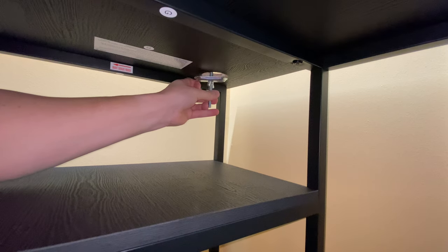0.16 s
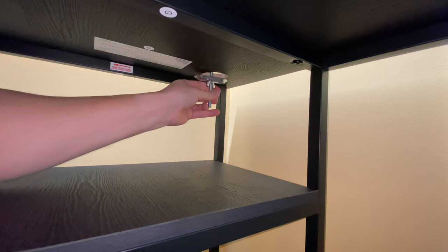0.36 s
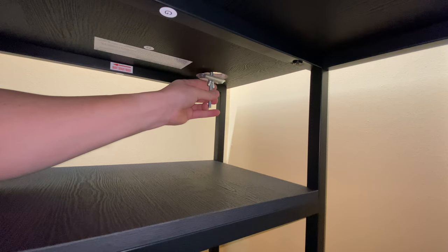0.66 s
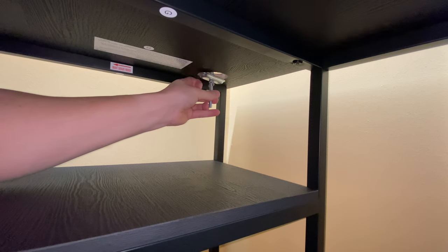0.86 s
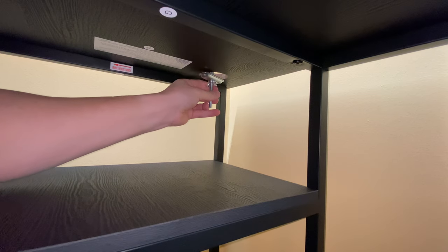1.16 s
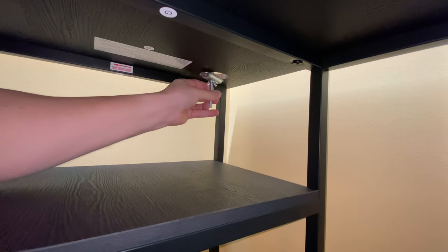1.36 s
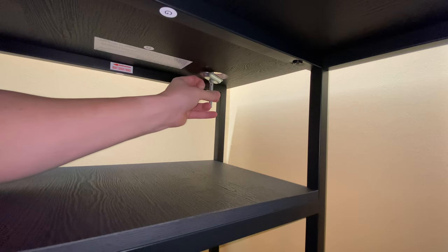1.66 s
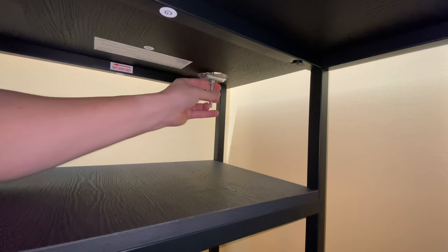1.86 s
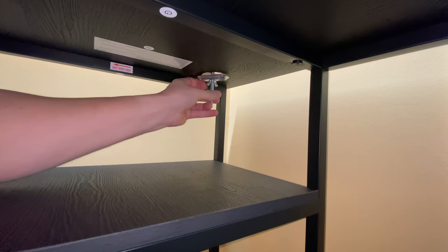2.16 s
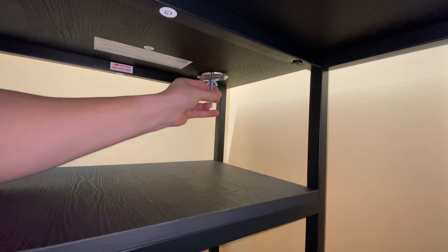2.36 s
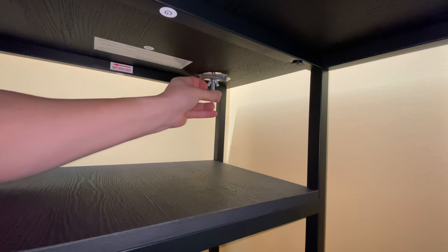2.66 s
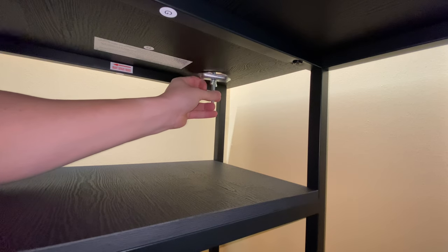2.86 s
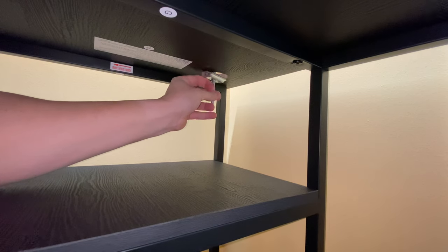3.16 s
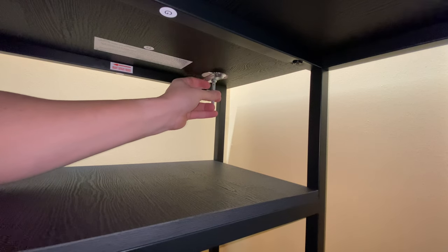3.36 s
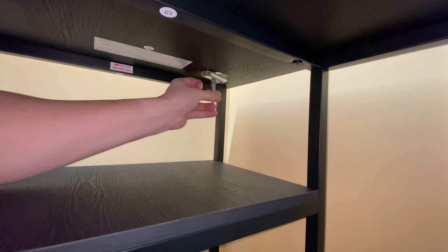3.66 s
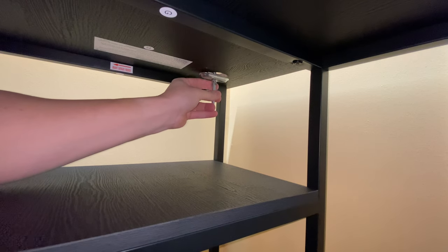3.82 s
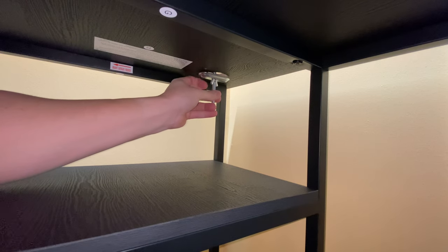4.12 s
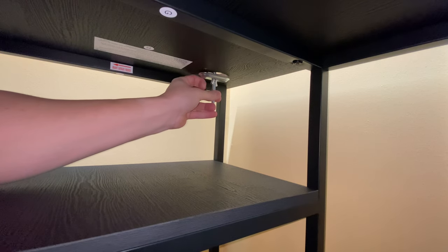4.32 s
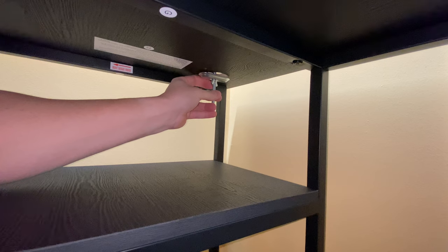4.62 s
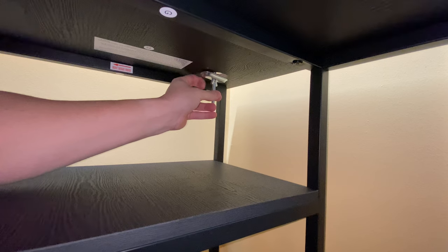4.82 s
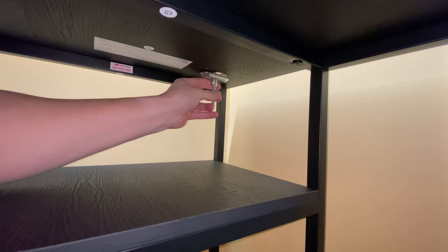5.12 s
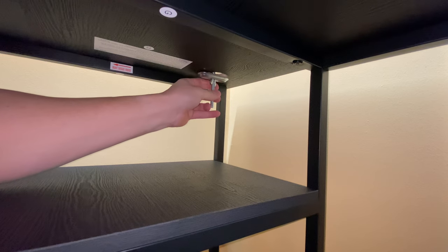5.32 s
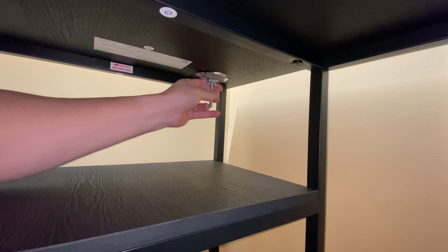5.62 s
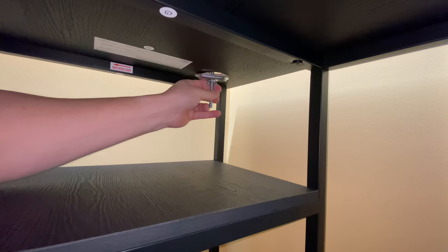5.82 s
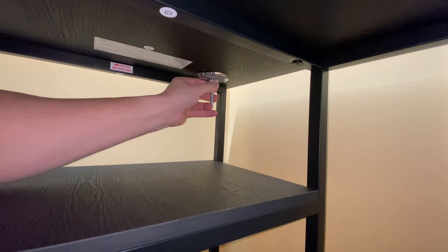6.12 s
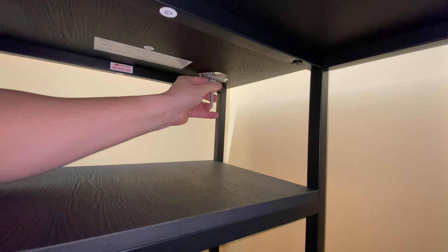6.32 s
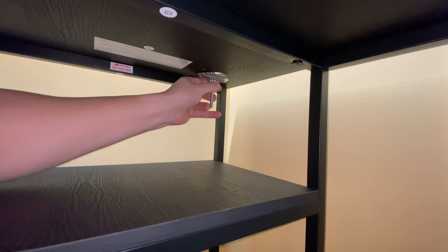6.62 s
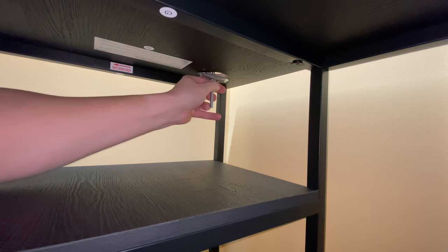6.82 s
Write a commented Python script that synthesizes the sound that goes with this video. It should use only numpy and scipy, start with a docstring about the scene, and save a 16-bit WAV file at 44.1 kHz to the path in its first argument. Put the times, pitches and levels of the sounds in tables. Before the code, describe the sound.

A loose steel plate chatters and clinks on a bolt as a wing nut is turned by hand under a wooden shelf, with three hard knocks.

```python
"""Wing nut turned under a shelf

A hand turns a wing nut up a bolt under a wooden shelf, and a loose steel plate chatters on the bolt.
Each contact is a burst of bounces that rings the plate's modes and raps the board; three hard knocks clank.
Hand bumps swing the shelf's low modes; noise rubs and ticks in the thread; shaped noise makes the
wings jingle, the fingers slide and a hand drag. Two microphone ports hear it in a small room with a low hum."""
import sys
import numpy as np
from scipy import signal
from scipy.fft import rfft, irfft, next_fast_len
from scipy.io import wavfile
from scipy.ndimage import map_coordinates

SR = 44100
rng = np.random.default_rng(int(sys.argv[2]) if len(sys.argv) > 2 else 0)


def to_wav(sig):
    """Store sig (one row per channel, or 1-D mono) as 16-bit WAV at the path in sys.argv[1].

    Samples outside -1..1 are clipped; the rate is SR.
    """
    pcm = np.clip(np.atleast_2d(sig), -1, 1) * 32767
    pcm = np.round(pcm).astype(np.int16)
    wavfile.write(sys.argv[1], SR, pcm.T)  # frames by channels


def voltage_ratio(decibels):
    """Convert decibels (scalar or array-like) to amplitude ratios, 20 dB per decade."""
    exponent = np.asarray(decibels, float) / 20
    return 10 ** exponent


N = 307818
T = np.arange(SR // 3) / SR  # clock of one short sound [s]
LEAD_IN_S = 0.006  # contacts and bumps start to swell this long before their listed time

# the steel plate's ringing modes: pitch [Hz]
PLATE_HZ = [2700, 2745, 2972, 3310, 4320, 5005, 5140, 5190, 5280, 5675, 5830, 6260, 6870, 7478, 9608, 9935,
            13552, 14112]
# strength and ring of the same modes: (level [dB], time to fall 60 dB before shortening [s])
PLATE_RING = [(1, 0.058), (-5, 0.14), (-5, 0.078), (-5, 0.078), (-14.5, 0.17), (-13.5, 0.17), (-1, 0.092),
              (-12, 0.2), (-28.5, 0.59), (-12.5, 0.1), (-18, 0.16), (1, 0.063), (-16, 0.5), (-1, 0.23),
              (-9, 0.35), (1.5, 0.067), (-8, 0.2), (-11.5, 0.098)]
# colour of the dense small modes of nut and bolt: (frequency [Hz], level [dB per Hz])
SIZZLE = [(2300, -49.5), (2700, 11), (3400, 6), (4000, -21.5), (5200, -11), (7000, -17), (8200, -16.5),
          (9900, -7.5), (11000, -8.5), (11600, -19.5), (13600, -23), (15000, -52.5), (16000, -72)]
# resonances of the wooden board: (frequency [Hz], width [Hz], level [dB])
BOARD = [(430, 60, -7), (591, 85, -2.5), (925.4, 40, 7), (1102, 96, 2), (1265, 57, 4.5), (1326, 149, 0),
         (1653, 186, -1.5), (1853, 140, 2.5), (2570, 180, -13.5), (2780, 100, -14.5), (3450, 220, -13)]
# colour of the shelf's low rumble: (frequency [Hz], level [dB per Hz])
SHELF_COLOUR = [(40, -41.5), (70, -16.5), (150, -8), (200, -11), (250, -2.5), (300, -5.5), (400, -7),
                (500, -19), (700, -21), (950, -22.5), (1500, -58.5)]


def unit(x):
    """Scale to rms 1."""
    return x / np.sqrt(np.mean(x ** 2) + 1e-20)


def along(points, hz):
    """Read a curve of (Hz, value) points on a log frequency axis."""
    f, v = np.transpose(points)
    return np.interp(np.log(hz + 1), np.log(f + 1), v)


def filtered(x, response):
    """Multiply the spectrum of x by a response, given as a function of frequency."""
    m = next_fast_len(x.shape[-1] + 8192)
    spectrum = rfft(x, m) * response(np.fft.rfftfreq(m, 1 / SR))
    return irfft(spectrum, m)[..., :x.shape[-1]]


def resonant(peaks, x):
    """Pass x through side-by-side resonances of (Hz, width Hz, dB), every other one upside down."""
    def response(f):
        return sum((-1) ** k * voltage_ratio(db) * 1j * f * width / (centre * centre - f * f + 1j * f * width)
                   for k, (centre, width, db) in enumerate(peaks))
    return filtered(x, response)


def hiss(spectrum, size):
    """Coloured noise of rms 1."""
    return unit(filtered(rng.standard_normal(size), lambda hz: voltage_ratio(along(spectrum, hz))))


def gritty(grit_db, rate):
    """Uneven gain of rms 1, drawn from random levels that come rate times a second."""
    knots = rng.standard_normal(int(N * rate / SR) + 4)
    return unit(voltage_ratio(grit_db * map_coordinates(knots, [np.arange(N) * rate / SR])))


def fade(t60, rise):
    """Rounded rise, then an exponential fall of 60 dB in t60 seconds."""
    return voltage_ratio(-60 * T / max(t60, .002)) * (1 - np.exp(-(T / rise) ** 2))


def add(track, s, sound):
    """Mix a sound in at time s."""
    track[round(s * SR):][:len(sound)] += sound


def air():
    """A wavering low hum and the faint rush of the house, partly shared by the ports."""
    # colour of the rush: (frequency [Hz], level [dB per Hz])
    rush_colour = [(25, -20), (38, -4.5), (60, 9.5), (174, -7.5), (271, -9.5), (703, -34), (2970, -29),
                   (3390, -54.5), (4050, -35), (8420, -49.5), (10500, -48.5), (12000, -45), (15600, -83),
                   (22000, -120)]
    hum_hz, hum_db, rush_db = 47.2, -56, -59
    shared, own = hiss(rush_colour, N), hiss(rush_colour, N)
    own = filtered(own, lambda hz: np.clip(hz / 500, .2, 1))  # the ports agree more in the bass
    hum = voltage_ratio(hum_db) * gritty(grit_db=7.0, rate=12) * np.sin(2 * np.pi * hum_hz * np.arange(N) / SR)
    return voltage_ratio(rush_db) * np.array([shared + own, shared - own]) + hum


def thread():
    """With each twist the nut's thread and the fingers rub, heard through board, steel and shelf."""
    # twists of the nut: (fastest moment [s], length [s], rub in board [dB], rub in steel [dB],
    # shelf shake [dB])
    twists = [(0.041, .25, -32, -38, -40.5), (.4, 0.37, -42, -43.5, -47.5), (.74, 0.394, -44.5, -58, -55),
              (0.992, 0.22, -47, -60, -50.5), (1.168, 0.34, -53, -63.5, -45), (1.603, 0.22, -53, -50, -59),
              (1.959, 0.34, -41, -52.5, -45.5), (2.327, .15, -49, -46, -35),
              (2.535, 0.13, -46.5, -52, -28.5), (2.813, 0.31, -43, -58, -48.5),
              (3.094, 0.15, -31, -40.5, -32), (3.299, 0.3, -53, -61, -46.5), (3.546, 0.18, -40, -42, -39.5),
              (3.71, 0.34, -53.5, -64, -46.5), (3.916, 0.18, -40, -55.5, -41),
              (4.38, 0.19, -48.5, -63, -54), (4.891, 0.19, -51, -66.5, -53), (5.301, 0.36, -62, -95, -50.5),
              (5.693, 0.52, -55, -81.5, -53.5), (6.106, 0.23, -49.5, -88, -46),
              (6.481, 0.34, -46.5, -57, -40.5), (6.745, 0.98, -66, -73, -67)]
    fade_db = 19  # loss half a length away from the fastest moment
    ticks_per_s, tick_db, tick_spread_db = 45, 27, 5.5  # burrs of the thread catch and let go
    s, length, *db = np.transpose(twists)
    t = np.arange(0, N / SR + .01, .002)
    speed = voltage_ratio(-fade_db * np.abs(t - s[:, None]) / (length[:, None] / 2))
    board, steel, shake = [np.interp(np.arange(N) / SR, t, level) for level in voltage_ratio(db) @ speed]

    tick_level = voltage_ratio(tick_db + tick_spread_db * rng.standard_normal(N))
    ticks = (rng.random(N) < ticks_per_s / SR) * tick_level
    catches = gritty(grit_db=6.5, rate=70) * rng.standard_normal((2, N)) + ticks
    rings = resonant([(hz, 30, level) for hz, (level, _) in zip(PLATE_HZ, PLATE_RING)], catches[0])
    scrape = unit(gritty(grit_db=9, rate=390) * hiss(SIZZLE, N) + 0.81 * unit(rings))
    rub = unit(resonant(BOARD, catches[1]))
    rumble = gritty(grit_db=4, rate=23) * hiss(SHELF_COLOUR, N)
    return board * rub + steel * scrape + shake * rumble


def plate():
    """Each contact is a short chatter of bounces that rings the plate's modes and raps the board."""
    # plate contacts: (time [s], bright ring [dB], body ring [dB], rap on the board [dB],
    # chatter length [s])
    contacts = [(0.036, -18.5, -32.5, -36.5, 0.03), (0.15, -29, -39, -34.5, 0.033),
                (.251, -45, -53, -48, .028), (0.319, -28.5, -40.5, -34, 0.018),
                (0.3465, -26.5, -43.5, -40, 0.054), (0.4216, -19, -30.5, -29.5, 0.021),
                (0.449, -20.5, -32, -24.5, .014), (.52, -37, -47, -42, 0.024),
                (0.57, -37.5, -44.5, -51, 0.017), (0.623, -42, -53, -48, 0.015),
                (0.676, -46, -53, -57, 0.018), (0.736, -36.5, -46.5, -40.5, .01),
                (0.7997, -27, -37.5, -29.5, .018), (.814, -14, -28, -26.5, 0.017),
                (.838, -22, -31.5, -29, .014), (1.0822, -38.5, -50.5, -40.5, 0.067),
                (1.531, -24, -36, -27.5, 0.027), (1.807, -62, -62.5, -48.5, 0.046),
                (1.8584, -24.5, -40, -38, .035), (1.901, -38, -45.5, -35, 0.036),
                (1.985, -13.5, -32.5, -29.5, 0.021), (2.2267, -20.5, -38.5, -28, 0.017),
                (2.2778, -23.5, -34.5, -32.5, 0.032), (2.503, -54, -55.5, -42.5, 0.054),
                (2.565, -34, -45, -35, 0.018), (2.5922, -37.5, -46, -42.5, .044),
                (2.732, -31.5, -40.5, -28, 0.038), (2.898, -47.5, -58, -46.5, 0.05),
                (2.942, -51, -53, -48, .047), (3.082, -22, -33, -35, .021),
                (3.171, -39.5, -46.5, -41, .032), (3.299, -54.5, -61, -45.5, .033),
                (3.375, -38, -45, -42, 0.045), (3.407, -46, -44.5, -34, 0.025),
                (3.459, -30, -40.5, -37, 0.038), (3.499, -45, -53, -37, 0.031),
                (3.545, -27.5, -44, -34.5, 0.027), (3.567, -27, -38.5, -47, 0.039),
                (3.653, -32.5, -49, -39, 0.022), (3.7254, -48.5, -52, -48.5, 0.045),
                (3.779, -57, -60, -51, 0.025), (3.828, -43.5, -49, -46.5, 0.039),
                (3.929, -32, -41, -34.5, 0.012), (3.943, -19, -38.5, -31.5, 0.019),
                (4.2401, -21, -37.5, -31, 0.014), (4.3099, -20, -31, -26, 0.023),
                (4.5905, -58, -68.5, -65, 0.023), (4.84, -81, -71, -61.5, .02),
                (4.727, -69.5, -69.5, -52, 0.08), (5.4727, -40, -55, -44, 0.03),
                (5.482, -29, -39, -41, 0.015), (5.684, -55, -66, -49.5, 0.026),
                (5.819, -77, -76, -57.5, 0.023), (5.855, -65, -76, -66, 0.015),
                (6.066, -58, -65, -51.5, .033), (6.107, -51, -63, -60, 0.017),
                (6.1375, -38.5, -44, -40, 0.023), (6.3155, -38.5, -47, -37.5, 0.037),
                (6.3525, -30.5, -40.5, -32, 0.034), (6.439, -27.5, -39, -38, 0.022),
                (6.462, -51, -67, -38, 0.052), (6.526, -37, -47.5, -44.5, 0.028),
                (6.707, -44.5, -48, -40.5, 0.032), (6.9197, -63, -64, -47.5, 0.077),
                (6.9714, -60, -64, -44, 0.033)]
    # pitches that part the bright, body and low rings: [Hz]
    part_edges = [8500, 3800]
    # clear modes over the bright, body and rap strength: [dB]
    modes_over = [-8, -0.3, 1.77]
    # dense buzz over the bright and body strength: [dB]
    buzz_over = [-3.5, 3.5]
    rap_over_db = 8.5  # the board's own answer over the rap strength
    bounce, snap, trail, rap = 0.69, 0.61, 3.54, 2.55  # t60 of each part over the chatter length
    ahead_s, ahead_db = 0.009, -18.5  # a faint copy sounds ahead of each contact, softening the attack

    out = np.zeros(N + SR)
    hz = np.c_[PLATE_HZ]
    mode_db, t60 = np.transpose(PLATE_RING)[:, :, None]
    sizzle = hiss(SIZZLE, N + SR)
    board = unit(resonant(BOARD, rng.standard_normal(N + SR)))
    bands = [unit(filtered(sizzle, lambda f: (f > low) & (f < high)))
             for low, high in zip(part_edges, [SR] + part_edges)]
    waves = np.exp(2j * np.pi * hz * T)
    part = np.sum([hz < edge for edge in part_edges], axis=0)  # 0 bright, 1 body, 2 low
    dying = voltage_ratio(mode_db - 60 * T / (0.77 * t60)) * waves.imag  # 0.77 shortens every ring

    for s, *strength_db, length in contacts:
        chance_db = 5 * rng.standard_normal((len(PLATE_RING), 1))  # modes differ from blow to blow
        # cubing leaves a few strong bounces among weak ones
        bounces = rng.standard_normal(len(T)) ** 3 * fade(bounce * length, 0.0064)
        # how much of the chatter falls on each mode, divided out to hold its level
        caught = np.abs(waves @ bounces)[:, None] + .4 * np.linalg.norm(bounces)
        modes = voltage_ratio(np.add(strength_db, modes_over)[part] + chance_db) / caught * dying
        struck = modes.sum(axis=0) * (1 - np.exp(-T / 0.00064))
        ring = signal.fftconvolve(struck, bounces)[:len(T)]

        now = slice(round(s * SR), round(s * SR) + len(T))
        buzz = sum(voltage_ratio(db + over_db) * band[now]
                   for db, over_db, band in zip(strength_db, buzz_over, bands))
        tick = 4 * fade(snap * length, .0079) + 0.67 * fade(trail * length, .0054)
        thud = voltage_ratio(strength_db[-1] + rap_over_db) * board[now] * fade(rap * length, 0.0062)
        blow = ring + buzz * tick + thud
        add(out, s - LEAD_IN_S, blow)
        add(out, s - LEAD_IN_S - ahead_s, voltage_ratio(ahead_db) * blow * fade(0.11, .001))
    return out[:N]


def shelf():
    """Soft bumps of the hand set the board's low modes swinging for a few cycles."""
    # hand on shelf, level and length before the factors below: (time [s], level [dB], pitch [Hz],
    # length [s])
    bumps = [(0.044, -22, 265, 0.037), (0.156, -38, 238.5, 0.059), (0.232, -38.5, 304, 0.043),
             (0.346, -30, 233, 0.038), (0.451, -24, 239, 0.021), (0.576, -37, 261, 0.03),
             (0.617, -38, 239, 0.0305), (0.738, -44, 243, 0.072), (0.81, -27.5, 261, 0.033),
             (0.837, -19.5, 278.3, 0.024), (0.957, -38, 116, 0.044), (1.083, -36.5, 244, 0.062),
             (1.266, -43.5, 294.6, 0.066), (1.326, -43.5, 233.6, 0.061), (1.536, -27.5, 240, 0.041),
             (1.721, -31, 394, 0.01), (1.808, -32.5, 259, 0.026), (1.858, -41, 224.3, 0.12),
             (1.983, -33.5, 251.5, 0.092), (2.248, -24.5, 323, 0.024), (2.504, -14.5, 274, 0.026),
             (2.734, -25, 236, 0.025), (2.837, -48.5, 237, 0.026), (2.883, -40, 263, 0.082),
             (2.938, -35, 248, 0.025), (3.026, -30, 318, 0.042), (3.274, -42, 246, 0.091),
             (3.378, -24, 284, 0.023), (3.462, -33, 164, 0.037), (3.558, -30, 245, 0.027),
             (3.659, -37, 400, 0.024), (3.83, -42.5, 251, 0.036), (3.933, -35, 302, 0.044),
             (4.062, -45.5, 404, 0.026), (4.245, -42, 255, 0.11), (4.316, -28.5, 317, 0.037),
             (4.63, -49.5, 157, 0.069), (4.734, -46, 254, 0.048), (4.911, -49.5, 117, 0.083),
             (5.256, -43, 234, 0.0259), (5.362, -37, 262, 0.036), (5.48, -34, 237, 0.033),
             (5.872, -42, 240, 0.062), (5.935, -37.5, 250, 0.037), (6.149, -35.5, 252, 0.028),
             (6.331, -29.5, 253, 0.033), (6.439, -28.5, 246, 0.027), (6.71, -33.5, 239, 0.025)]
    swing_db, swing_t60 = 3.5, 3.02  # envelope over the listed level; t60 over the listed length
    out, body = np.zeros(N + SR), hiss(SHELF_COLOUR, N + SR)
    for s, db, hz, length in bumps:
        swing = np.sin(2 * np.pi * hz * T) + 0.72 * body[round(s * SR):][:len(T)]
        add(out, s - LEAD_IN_S, voltage_ratio(db + swing_db) * swing * fade(swing_t60 * length, 0.0058))
    return out[:N]


def knocks():
    """The plate's edge hits the board: one sharp blow, then a splintery decay, both through a clank."""
    # hard hits, level before the offsets below: (time [s], level [dB], time to fall 60 dB [s])
    hits = [(2.255, -7.5, 0.04), (2.727, -8.5, 0.02), (3.026, -9.5, 0.043)]
    # the board under a hard blow: (frequency [Hz], width in the decay [Hz], level [dB])
    clank_peaks = [(680, 90, 2), (874, 330, 1.5), (1185, 380, 4), (1844, 84, 8.5), (2144, 90, 5),
                   (2656, 170, 3.5), (3085, 180, -7.5), (4180, 730, -15.5)]
    crack_db, splinter_db = 20, -2.5  # first blow and decay over the listed level
    crack_wider = 4.2  # widening of the resonances in the blow
    blows, after = np.zeros(N + SR), np.zeros(N + SR)
    clank = unit(resonant(clank_peaks, rng.standard_normal(N + SR)))
    for s, db, t60 in hits:
        start = round(s * SR)
        blows[start] = voltage_ratio(db + crack_db)
        add(after, s, voltage_ratio(db + splinter_db) * clank[start:][:len(T)] * fade(t60, .0005))
    wide_peaks = [(hz, crack_wider * width, db) for hz, width, db in clank_peaks]
    return (resonant(wide_peaks, blows) + after)[:N]


def wings():
    """The nut's wings jingle: a loose shiver of noise in close high modes."""
    # jingles: (time [s], level [dB], time to fall 60 dB [s])
    jingles = [(6.137, -39.5, 0.15), (6.316, -39, .08), (4.33, -45, 0.097)]
    # modes of the wings, passed twice: (frequency [Hz], width [Hz], level [dB])
    wing_peaks = [(5130, 120, 1.5), (5680, 150, 0), (5810, 144, -3), (6150, 180, -13)]
    out = np.zeros(N + SR)
    shiver = unit(resonant(wing_peaks, resonant(wing_peaks, rng.standard_normal(N + SR))))
    for s, db, t60 in jingles:
        add(out, s, voltage_ratio(db) * shiver[round(s * SR):][:len(T)] * fade(t60, 0.0014))
    return out[:N]


def fingers():
    """Fingertips slide on the board: soft broad swishes of skin, made of noise that swells and dies."""
    # slides, times for a change of 28.5 dB: (loudest moment [s], level [dB], swell [s], die-away [s])
    slides = [(4.944, -42, 0.097, 0.06), (5.3, -60.5, .07, 0.14), (6.08, -49.5, 0.063, 0.044)]
    # colour of the swish: (frequency [Hz], level [dB per Hz])
    skin_colour = [(240, -30), (400, 3), (851, -4), (1510, 1.5), (1670, -13), (2810, -19), (3710, -14.5),
                   (4460, -25.5), (9500, -38), (12400, -68), (20900, -120)]
    t = np.arange(N) / SR
    level = sum(voltage_ratio(db - 28.5 * np.maximum((s - t) / swell, (t - s) / die))
                for s, db, swell, die in slides)
    return level * gritty(grit_db=1.5, rate=60) * hiss(skin_colour, N)


def drag():
    """A faint drone: noise in a few narrow resonances, held while the hand drags."""
    # the drone: (frequency [Hz], width [Hz], level [dB])
    drone_peaks = [(433, 29, -1), (1187, 74, -7), (1750, 51, -20)]
    start_s, end_s, edge_s, level_db = 4.95, 5.27, 0.05, -57.5  # ramps lie outside start and end
    t = np.arange(N) / SR
    held = np.clip(np.minimum(t - start_s, end_s - t) / edge_s + 1, 0, 1)
    return voltage_ratio(level_db) * held * unit(resonant(drone_peaks, rng.standard_normal(N)))


def room(x):
    """Diffuse echo: dying noise, unlike at the two ports and drawn anew for each third of a second."""
    # how long the echo lasts: (frequency [Hz], time to fall 60 dB [s])
    echo_t60 = [(100, 0.22), (1000, 0.35), (5000, 0.36), (14000, 0.1)]
    # how loud it is: (frequency [Hz], echo over direct sound [dB])
    echo_level = [(100, -1.5), (1500, -5.5), (6000, -2.5), (10000, -6)]
    out, hop = np.zeros((2, N + 2 * SR)), SR // 3
    x = filtered(x, lambda hz: voltage_ratio(along(echo_level, hz)))
    for start in range(0, N, hop):
        hz, t, z = signal.stft(rng.standard_normal((2, SR // 2)), SR, nperseg=256)
        dying = z * voltage_ratio(-60 * t / along(echo_t60, hz)[:, None])
        tail = signal.istft(dying, SR, nperseg=256)[1]
        wet = signal.fftconvolve(x[None, start:start + hop], tail / np.linalg.norm(tail[0]), axes=1)
        late = start + 150  # the echo sets in 150 samples after the direct sound
        out[:, late:late + wet.shape[1]] += wet
    return out[:, :N]


def scene():
    """The shelf stands nearer the left port, which hears it first."""
    # how far the left port leads: (frequency [Hz], phase [radians])
    left_lead = [(0, 0), (1380, 4.5), (2500, 15.5), (4820, 21), (5250, 13.5), (6200, 25.5), (7490, 27),
                 (8790, 10), (9470, 20), (11400, 15.5), (12700, 27.5), (13200, 14), (14700, 7), (15800, -2)]
    # balance of the ports: (frequency [Hz], left over right [dB])
    left_over_right = [(60, 1), (150, 8), (380, 5), (950, 3), (2380, 4), (5980, 8.5), (15000, -5.5)]
    near = plate() + knocks() + shelf() + thread() + fingers() + wings() + drag()
    side = np.array([[.5], [-.5]])  # half of each difference goes to each port
    direct = filtered(np.array([near, near]),
                      lambda hz: np.exp(1j * side * np.interp(hz, *np.transpose(left_lead))))
    return filtered(direct + room(near) + air(), lambda hz: voltage_ratio(side * along(left_over_right, hz)))


def top_cut(x):
    """Nothing passes above the cut-off."""
    return signal.sosfilt(signal.butter(12, 16300, fs=SR, output="sos"), x)


def record(dry):
    """Tone shaping: the sound is dark around 12 kHz and fades out above 15 kHz."""
    # colour of the treble: (frequency [Hz], level [dB])
    treble_colour = [(10900, 0), (12200, -16), (13300, 0), (14600, 0), (15500, -8), (16300, -40)]
    mix = filtered(dry, lambda hz: voltage_ratio(along(treble_colour, hz)))
    return top_cut(mix)


dry = scene()
out = record(dry)
to_wav(out)
```